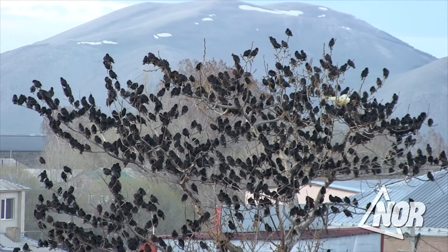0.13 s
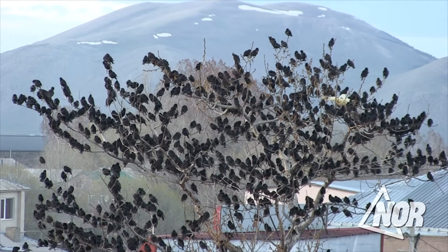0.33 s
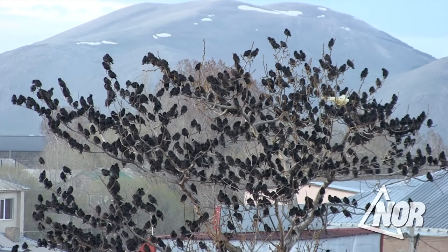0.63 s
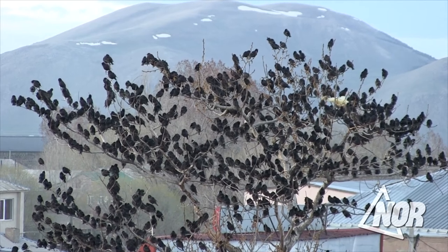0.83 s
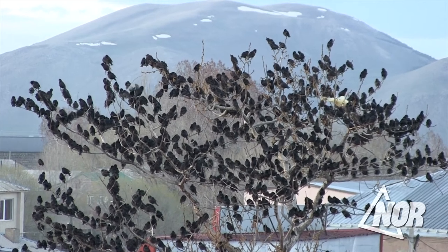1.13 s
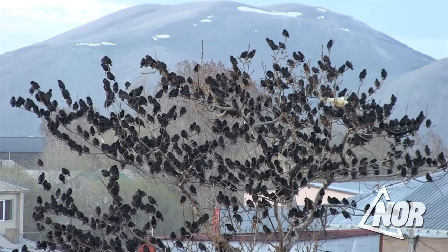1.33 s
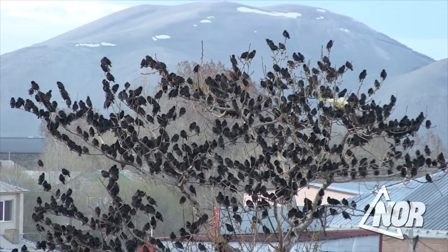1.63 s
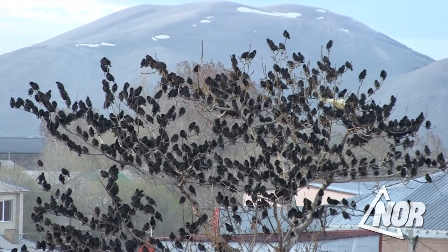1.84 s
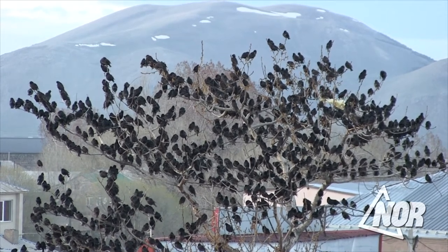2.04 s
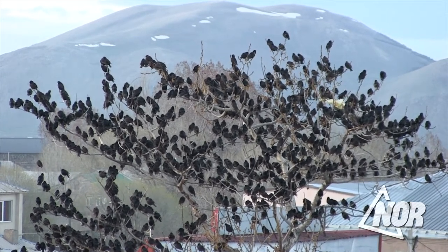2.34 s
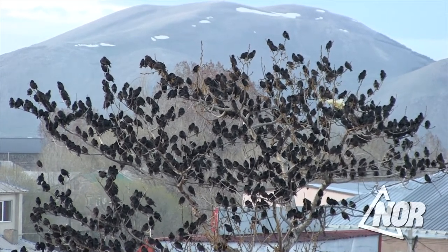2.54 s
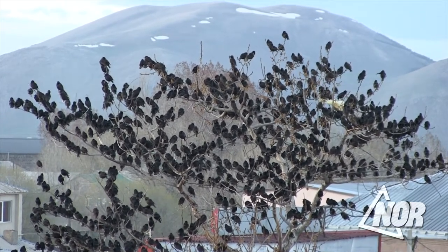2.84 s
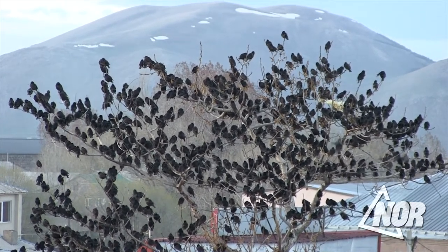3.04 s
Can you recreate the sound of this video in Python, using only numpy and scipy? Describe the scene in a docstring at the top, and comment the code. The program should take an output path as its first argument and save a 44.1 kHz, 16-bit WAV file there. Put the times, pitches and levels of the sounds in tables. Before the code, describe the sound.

After a very brief silence, a dense chorus of starlings starts abruptly and continues throughout, with quick nearer chirps and downward whistles over low far-off traffic; open yard, slight reflections, sound on the right channel only.

```python
"""Starlings chatter in a bare tree: high whistles that mostly slide down, lower warbles and buzzy rattles.
They pile up into a dense chorus, a few nearer whistles stand out, and traffic drones far off.
Birds are gliding sine tones over coloured noise; traffic is low noise and noise through narrow resonances.
One microphone feeds the right channel; the left carries only a faint hiss.
The sound starts after a short silence."""
import sys
import numpy as np
from scipy import signal
from scipy.fft import rfft, irfft, next_fast_len
from scipy.io import wavfile

SR = 44100
rng = np.random.default_rng(int(sys.argv[2]) if len(sys.argv) > 2 else 0)


def ratio(d):
    """dB to gain"""
    e = np.asarray(d, float) / 20
    return 10 ** e


def to_wav(s):
    """Save 16-bit WAV."""
    ch = np.atleast_2d(s).T  # columns
    pcm = np.round(np.clip(ch, -1, 1) * 32767)  # PCM
    wavfile.write(sys.argv[1], SR, pcm.astype(np.int16))


N = 140679

# Bird, traffic and treble levels hold before scene() doubles the mix. Colours are shapes: only
# the differences between their rows matter.

# Faint hiss on the left channel. Each row: frequency in Hz, strength in dB per Hz.
LEFT_HISS_COLOUR = [(20, 6), (60, 14), (300, 11), (700, 7), (3500, 6), (6500, 10), (8300, 3), (9700, 9.5),
                    (14000, 7.5), (15700, -13)]

# Faint top overtones. Each row: frequency in Hz, strength in dB per Hz.
AIR_COLOUR = [(6650, -39), (11300, 2.5), (14600, 0), (15600, -2)]
# Their loudness over time. Each row: time in seconds, level in dB rms.
AIR_LEVEL = [(0.13, -77), (0.88, -74.5), (1.02, -80.5), (1.44, -71.5), (1.57, -78), (2.0, -71), (2.23, -82),
             (2.41, -71), (2.8, -77), (3.19, -76)]
# Thin band of faint treble around 10 to 11 kHz. Each row: frequency in Hz, strength in dB per Hz.
THIN_BAND_COLOUR = [(9300, -8), (9600, 5), (11300, 2), (11800, -5)]
# The thin band flickers. Each row: time in seconds, level in dB rms.
THIN_BAND_LEVEL = [(0.13, -80), (0.29, -75), (0.5, -84), (0.56, -69), (0.62, -87), (0.73, -83), (0.78, -90),
                   (0.82, -79), (1.15, -83), (1.19, -77), (1.43, -80), (1.49, -75), (1.58, -85),
                   (1.65, -78), (1.67, -98), (1.77, -77.5), (3.18, -81), (3.19, -80)]

# Traffic rumble. Each row: frequency in Hz, strength in dB per Hz.
RUMBLE_COLOUR = [(13, -46), (22, -15), (43, -11), (59, -6.5), (81, -11.5), (113, -1.5), (151, -7.5),
                 (200, -0.5), (325, -5.5), (380, -9.5), (415, -10), (608, -10), (775, -12), (1180, -14),
                 (1400, -14), (1820, -11), (3080, -120)]
# Its loudness over time. Each row: time in seconds, level in dB rms.
RUMBLE_LEVEL = [(0.13, -58), (0.16, -53.5), (0.27, -59), (0.32, -54.5), (0.36, -57), (0.45, -56),
                (2.35, -56), (3.19, -53)]
# Engine drones. Each row: frequency in Hz, width in Hz, level in dB rms.
ENGINE_BANDS = [(56.8, 5, -67.5), (113.1, 6.4, -64), (184, 8.5, -65), (377, 8.8, -70.5)]
# Whine of a vehicle's tyres. Each row: frequency in Hz, width in Hz, level in dB against the other rows.
TYRE_BANDS = [(542, 42, 6), (630, 25, 6), (665, 21, 5.5), (844, 5.7, 1)]
# The vehicle draws nearer. Each row: time in seconds, level in dB rms.
TYRE_LEVEL = [(1.3, -69.5), (2.0, -63.5), (2.6, -62), (3.19, -57)]

# Reflections from the yard. Each row: delay in seconds, level in dB against the direct sound.
ECHOES = [(.023, -13), (.051, -15), (.094, -18)]

# Lower chorus, pitch and strength. Each row: frequency in Hz, strength in dB per Hz.
LOW_COLOUR = [(800, -42), (1000, -10), (1180, -10), (1630, -5), (1990, -4), (2580, -1.5), (3300, -2),
              (4250, -2), (5200, -4.5), (5700, -6), (6200, -30)]
# Its loudness over time. Each row: time in seconds, level in dB rms.
LOW_LEVEL = [(0.13, -51), (0.5, -49.5), (0.54, -49.5), (0.73, -51), (0.92, -48.5), (0.95, -51), (1.47, -51),
             (1.49, -47.5), (1.62, -50.5), (1.69, -46.5), (1.77, -49.5), (2.03, -50), (2.14, -49),
             (2.47, -50), (2.57, -48), (2.59, -49), (3.16, -49.5), (3.19, -50)]
# High voices, pitch and strength. Each row: frequency in Hz, strength in dB per Hz.
MID_COLOUR = [(5000, -28), (5400, -9.5), (5900, -1.5), (6400, 1.5), (6900, -0.5), (7300, -3.5), (7700, -17),
              (8200, -40)]
# Their loudness over time. Each row: time in seconds, level in dB rms.
MID_LEVEL = [(0.13, -50), (0.18, -48.5), (0.54, -54.5), (0.87, -47.5), (1.04, -52.5), (1.63, -47.5),
             (1.64, -50), (1.91, -50.5), (1.96, -47.5), (2.04, -52), (2.45, -52.5), (2.47, -48.5),
             (2.71, -50.5), (2.8, -51), (2.83, -50.5), (2.87, -53), (2.89, -50), (3.17, -50.5)]
# Highest voices, pitch and strength. Each row: frequency in Hz, strength in dB per Hz.
HIGH_COLOUR = [(6900, -22), (7300, 0.5), (7800, 0), (8330, -0.5), (8860, -8.5), (9300, -16.5), (9600, -33),
               (9900, -80)]
# Their loudness over time. Each row: time in seconds, level in dB rms.
HIGH_LEVEL = [(0.13, -51.5), (0.32, -54), (0.66, -54.5), (0.89, -47), (1.1, -56), (1.14, -52),
              (1.58, -51.5), (1.63, -48.5), (1.65, -54), (1.76, -53), (1.89, -47), (1.94, -51.5),
              (2.29, -54.5), (2.31, -52.5), (2.68, -53), (2.69, -57), (2.74, -55), (3.17, -56.5)]

# Nearer whistles, before their flutter and echoes. Each row: start in seconds, length in seconds,
# first pitch in Hz, last pitch in Hz, level in dB rms at full strength.
WHISTLES = [(0.268, 0.036, 5450, 5440, -58), (0.298, 0.033, 5650, 5600, -56),
            (0.534, 0.05, 4960, 4950, -52.5), (.59, 0.065, 9100, 9100, -63),
            (0.621, 0.066, 3480, 3110, -57), (0.701, .03, 8400, 8460, -57.5),
            (0.722, 0.05, 9100, 7840, -53), (.82, 0.036, 7100, 6750, -52), (0.847, 0.08, 8900, 9180, -62),
            (0.864, 0.1, 7800, 7300, -54), (0.941, 0.1, 5700, 5730, -59), (0.968, 0.089, 8750, 8460, -56.5),
            (1.082, .025, 6400, 5660, -49.5), (1.191, 0.026, 8500, 8600, -50),
            (1.23, 0.018, 8900, 7400, -57), (1.26, 0.028, 7600, 7870, -53), (1.467, .07, 8600, 9280, -56),
            (1.57, 0.083, 6300, 5640, -51.5), (1.582, 0.036, 8750, 8700, -57),
            (1.615, 0.038, 7700, 8340, -53), (1.623, .11, 8900, 9050, -59), (1.665, 0.057, 4250, 4140, -53),
            (1.76, 0.092, 2450, 2716, -64), (2.133, 0.062, 5520, 5960, -54),
            (1.907, 0.07, 8600, 8550, -58.5), (1.941, 0.038, 6100, 5600, -55),
            (2.05, 0.045, 3050, 3130, -57.5), (2.068, 0.088, 8500, 8770, -58),
            (2.15, 0.019, 3800, 3700, -51.5), (2.325, 0.046, 8300, 8420, -53.5),
            (2.63, 0.036, 8160, 6600, -49.5), (2.519, 0.027, 6100, 7180, -52),
            (2.705, 0.022, 7000, 6530, -51), (1.773, .06, 5700, 6300, -55), (1.84, 0.044, 6270, 5950, -54),
            (2.546, 0.038, 4250, 4213, -49.5), (2.807, .04, 5650, 5990, -51),
            (2.903, 0.031, 5700, 5540, -50), (2.91, 0.027, 4400, 4350, -54),
            (3.032, 0.052, 6050, 6300, -54), (3.035, .05, 4300, 4400, -55),
            (3.121, 0.037, 6200, 6170, -48.5), (3.153, 0.047, 3900, 4740, -50.5)]
# Clear birds with longer slides, one list per bird, before their echoes.
# Each row: time in seconds, pitch in Hz, level in dB rms.
LONG_WHISTLES = [
    [(1.865, 8665, -52), (1.889, 7687, -49), (1.923, 7006, -49), (1.945, 6860, -48.5), (2.001, 6435, -49.5),
     (2.037, 6620, -53), (2.097, 6263, -55), (2.13, 6170, -58)],
    [(1.15, 7750, -56), (1.18, 7250, -52), (1.21, 6950, -51), (1.26, 6760, -52), (1.28, 6700, -58)],
    [(2.492, 2330, -54), (2.512, 2480, -51), (2.535, 2900, -53), (2.565, 3150, -60)],
    [(1.0, 3000, -63), (1.1, 2800, -60), (1.2, 2600, -62), (1.3, 2400, -64)],
]

# Shape of every short call, as shares of its length: how soon the slide settles, and each soft end.
SLIDE_SHARE, EDGE_SHARE = .6, .2
OCTAVE_DB = -31   # second harmonic against the main tone
WAVER = .005   # random pitch wobble, as a share of the pitch
FLUTTER_DB = 3.0   # random strength wobble of the short near whistles

# Chorus: usual slide and share of buzzing calls, and farther birds in dB against the calls.
HIGH_SLIDE, HIGH_BUZZ_SHARE, HIGH_BLUR_DB = -.06, .12, -4
LOW_SLIDE, LOW_BUZZ_SHARE, LOW_BLUR_DB = -.03, .75, 1
BUZZ_HZ, BUZZ_DEPTH = 170, .045   # speed of the pitch shake, and its depth as a share of the pitch
SLIDE_SPREAD, ARCH_SPREAD = .09, .035   # how calls differ in slide and bow, as shares of the pitch
CALL_S, SIZE_SPREAD_DB, TOP_HZ = .028, 2.6, 9300   # typical length, spread in strength, limit of slides


def rms_one(x):
    """Scales a sound to rms 1."""
    return x / np.sqrt(np.mean(x ** 2) + 1e-20)


def level(rows):
    """Loudness curve through (seconds, dB) points, as a factor for every sample."""
    s, db = np.transpose(rows)
    return ratio(np.interp(np.arange(N) / SR, s, db))


def at_hz(points, hz):
    """Reads a colour at any pitch, on a logarithmic pitch scale."""
    p = np.array(points)
    return np.interp(np.log(hz + 1e-3), np.log(p[:, 0]), p[:, 1], left=-90, right=-90)


def drift(rate_hz):
    """Smooth random wobble of rms 1: noise through a two-pole low-pass at every 40th sample."""
    r = np.exp(-80 * np.pi * rate_hz / SR)
    noise = rng.standard_normal(N // 40 + 2002)
    slow = signal.lfilter([1], [1, -2 * r, r * r], noise)[2000:]   # skip the filter's start
    return np.interp(np.arange(N) / 40, np.arange(len(slow)), rms_one(slow))


def hiss(colour, patchy_db, count):
    """Coloured noise in bands that each swell and sink on their own; rms 1."""
    size = next_fast_len(N)
    hz = np.arange(size // 2 + 1) * SR / size
    shaped = rfft(rng.standard_normal(size)) * ratio(at_hz(colour, hz))
    edges = np.geomspace(colour[0][0], colour[-1][0], count + 1)
    out = np.zeros(N)
    for a, b in zip(edges, edges[1:]):
        band = irfft(shaped * (hz >= a) * (hz < b), size)[:N]
        out += band * ratio(patchy_db * drift(6.0))
    return rms_one(out)


def left_hiss():
    """The left channel carries steady faint noise at -83 dB rms."""
    return ratio(-83) * hiss(LEFT_HISS_COLOUR, patchy_db=0.5, count=2)


def faint_treble():
    """Patchy noise for the top overtones, and a thin band around 10 to 11 kHz that flickers."""
    air = level(AIR_LEVEL) * hiss(AIR_COLOUR, patchy_db=3.0, count=10)
    thin_band = level(THIN_BAND_LEVEL) * hiss(THIN_BAND_COLOUR, patchy_db=3.5, count=6)
    return air + thin_band


def drones(bands):
    """Noise through narrow resonances, which gives it rough pitches."""
    out = np.zeros(N)
    for hz, width, db in bands:
        r = np.exp(-np.pi * width / SR)
        poles = [1, -2 * r * np.cos(2 * np.pi * hz / SR), r * r]
        out += ratio(db) * rms_one(signal.lfilter([1, 0, -1], poles, rng.standard_normal(N)))
    return out


def traffic():
    """Rumble with engine drones, and the narrow whine of a vehicle that comes closer."""
    rumble = level(RUMBLE_LEVEL) * hiss(RUMBLE_COLOUR, patchy_db=1.0, count=10)
    tyres = level(TYRE_LEVEL) * rms_one(drones(TYRE_BANDS))
    return rumble + drones(ENGINE_BANDS) + tyres


def echoes(x):
    """A few reflections from the yard: later, weaker copies join the sound."""
    out = x
    for s, db in ECHOES:
        out = out + ratio(db) * np.interp(np.arange(N) - s * SR, np.arange(N), x, left=0)
    return out


def bird_tone(hz):
    """A near sine that follows a pitch line, with a weak octave above it."""
    phase = 2 * np.pi * np.cumsum(hz) / SR
    return np.sqrt(2) * (np.sin(phase) + ratio(OCTAVE_DB) * np.sin(2 * phase))


def add_call(out, start, length, first_hz, last_hz, db, buzz, arch, waver):
    """One call: its pitch slides fast, then settles; a buzz shakes it and an arch bows it."""
    i, n = int(start * SR), int(length * SR)
    u = np.arange(max(min(n, N - i), 0)) / n   # 0 to 1 through the call
    here = slice(i, i + len(u))
    slide = (1 - np.exp(-u / SLIDE_SHARE)) / (1 - np.exp(-1 / SLIDE_SHARE))
    shake = buzz * np.sin(2 * np.pi * BUZZ_HZ * u * length)
    bow = arch * np.sin(np.pi * u)
    hz = (first_hz + (last_hz - first_hz) * slide) * (1 + shake + bow + waver[here])
    shape = np.sin(np.pi / 2 * np.clip(np.minimum(u, 1 - u) / EDGE_SHARE, 0, 1)) ** 2
    out[here] += ratio(db) * shape * bird_tone(hz)


def chorus(colour, slide, buzz_share, blur_db, count):
    """Random calls of many birds, with echoes, over a noise blur of farther ones; rms 1."""
    calls, waver = np.zeros(N), WAVER * drift(76.0)
    chance = rng.random((count, 3))
    normal = np.clip(rng.standard_normal((count, 4)), -2, 2)
    lowest, highest = colour[1][0], colour[-2][0]
    for (when, pitch, kind), (long, bend, size, bow) in zip(chance, normal):
        hz = lowest + pitch * (highest - lowest)
        move = hz * (slide + SLIDE_SPREAD * bend)
        ceiling = max(TOP_HZ, hz)
        first_hz, last_hz = min(hz - .6 * move, ceiling), min(hz + .4 * move, ceiling)
        db = at_hz(colour, hz) + SIZE_SPREAD_DB * size
        buzz = BUZZ_DEPTH * (kind < buzz_share)
        arch = ARCH_SPREAD * bow * (hz < TOP_HZ - 600)   # the highest calls stay unbowed
        add_call(calls, when * N / SR, CALL_S * np.exp(.5 * long), first_hz, last_hz, db, buzz, arch, waver)
    blur = ratio(blur_db) * hiss(colour, patchy_db=-1.5, count=10)
    return rms_one(rms_one(echoes(calls)) + blur)


def long_whistle(rows):
    """One clear bird follows its own pitch line, with 10 ms soft ends."""
    s, hz, db = np.transpose(rows)
    t = np.arange(N) / SR
    shape = np.clip(np.minimum(t - s[0], s[-1] - t) / .01, 0, 1)
    return level(np.c_[s, db]) * shape * bird_tone(np.interp(t, s, hz))


def near_birds():
    """The whistles that stand out: short ones unsteady in strength, and clear longer slides."""
    short, waver = np.zeros(N), WAVER * drift(60.0)
    for row in WHISTLES:
        add_call(short, *row, 0, 0, waver)
    return short * ratio(FLUTTER_DB * drift(83.0)) + sum(map(long_whistle, LONG_WHISTLES))


def scene():
    """Everything reaches one microphone, on the right; the left stays empty."""
    low = level(LOW_LEVEL) * chorus(LOW_COLOUR, LOW_SLIDE, LOW_BUZZ_SHARE, LOW_BLUR_DB, count=1700)
    mid = level(MID_LEVEL) * chorus(MID_COLOUR, HIGH_SLIDE, HIGH_BUZZ_SHARE, HIGH_BLUR_DB, count=800)
    high = level(HIGH_LEVEL) * chorus(HIGH_COLOUR, HIGH_SLIDE, HIGH_BUZZ_SHARE, HIGH_BLUR_DB, count=800)
    background = faint_treble() + traffic()
    right = 2 * (background + low + mid + high + echoes(near_birds()))
    return np.array([np.zeros(N), right])


def band_limit(x):
    """A steep low-pass at the top of the band."""
    return signal.sosfilt(signal.butter(12, 15730, fs=SR, output="sos"), x)


def record(dry):
    """Faint hiss joins the left channel; both channels fade in quickly after a silence."""
    start_s, fade_in_s = 0.1167, 0.0039
    on = np.clip((np.arange(N) / SR - start_s) / fade_in_s, 0, 1)
    mix = (dry + left_hiss() * [[1], [0]]) * on
    return band_limit(mix)


dry = scene()
out = record(dry)
to_wav(out)
```